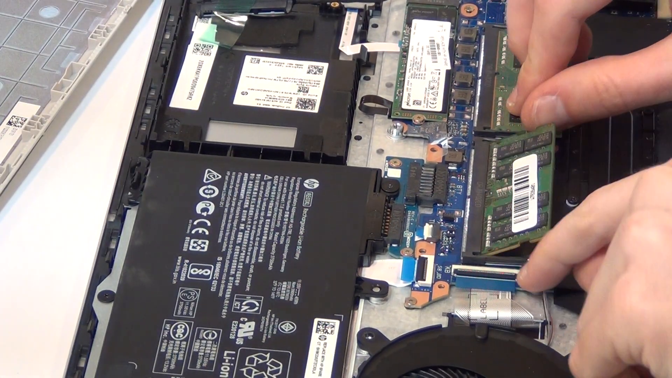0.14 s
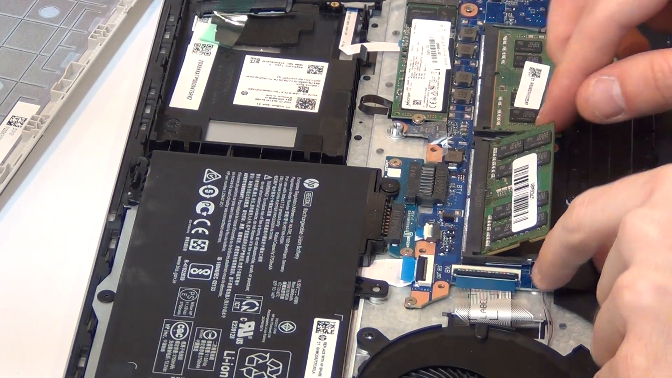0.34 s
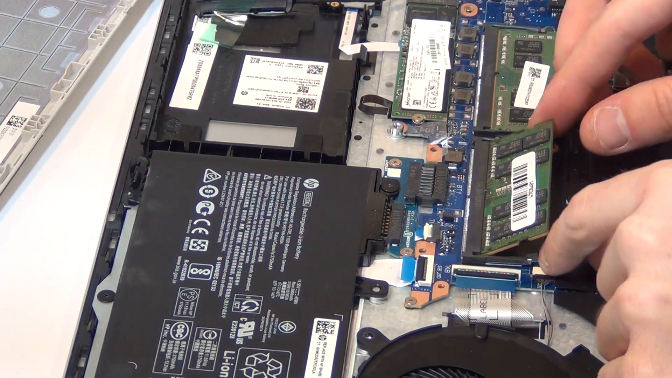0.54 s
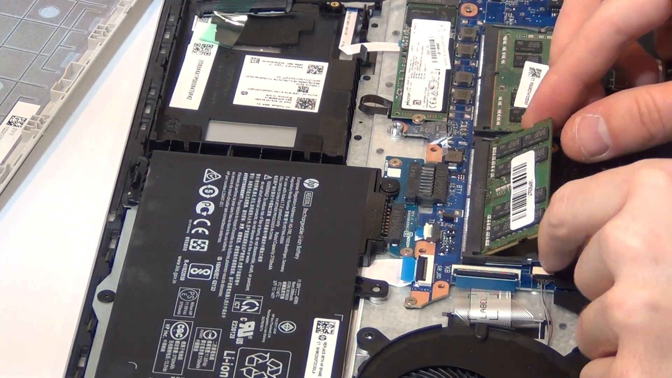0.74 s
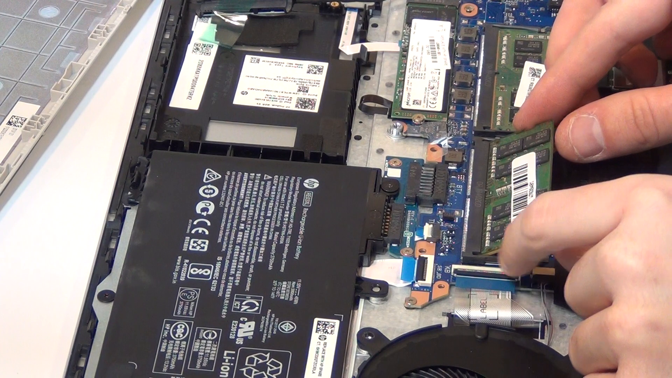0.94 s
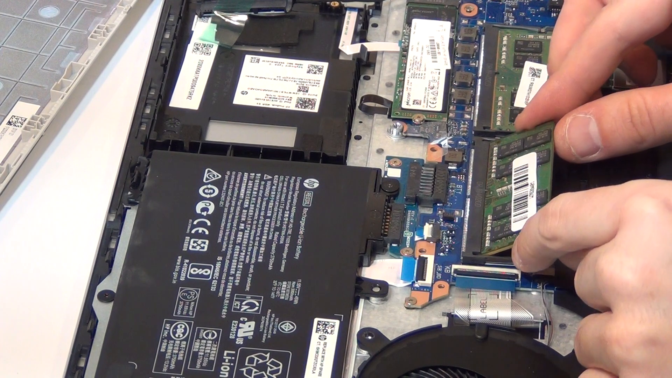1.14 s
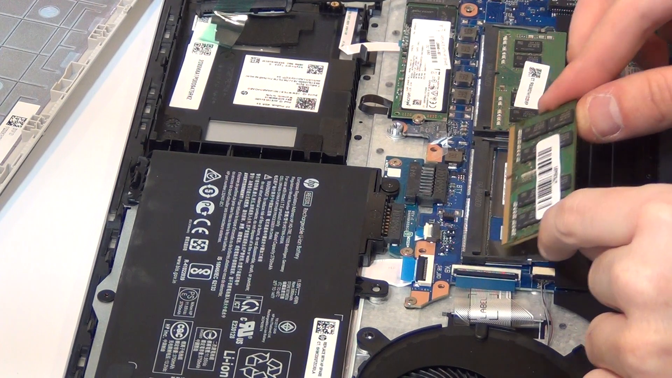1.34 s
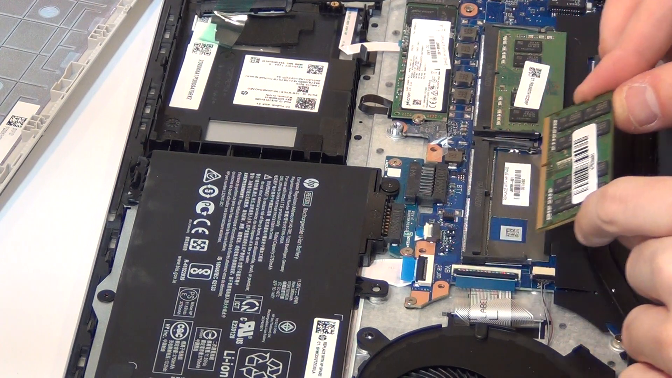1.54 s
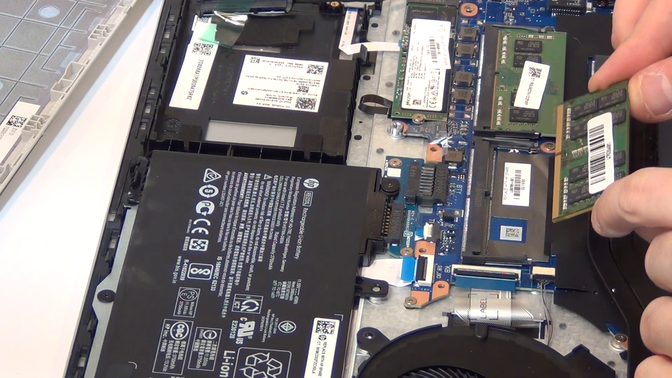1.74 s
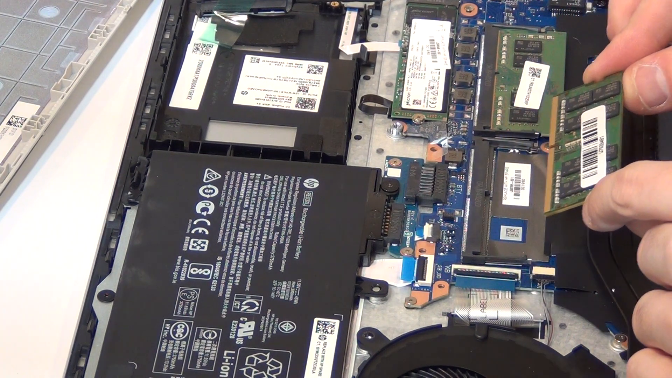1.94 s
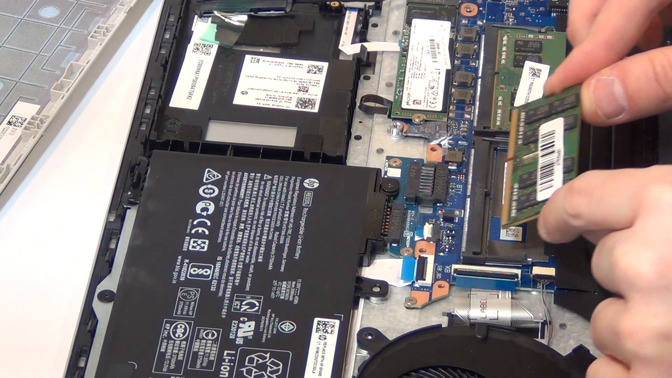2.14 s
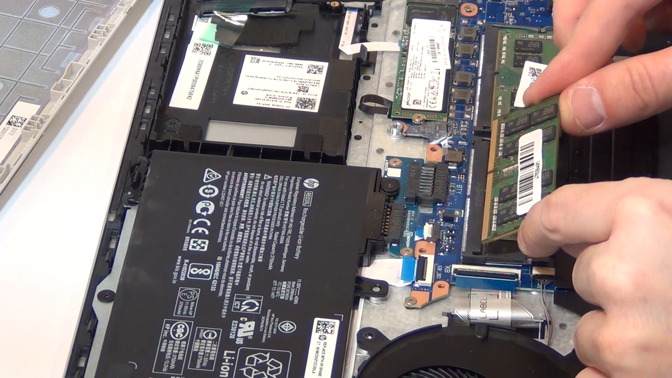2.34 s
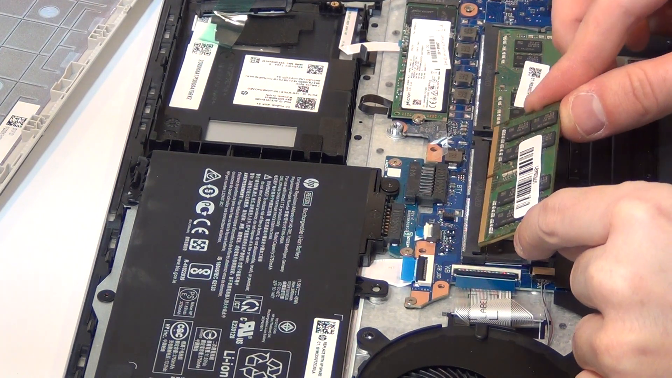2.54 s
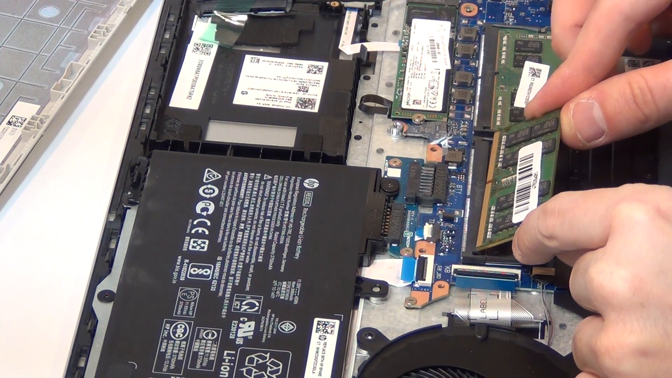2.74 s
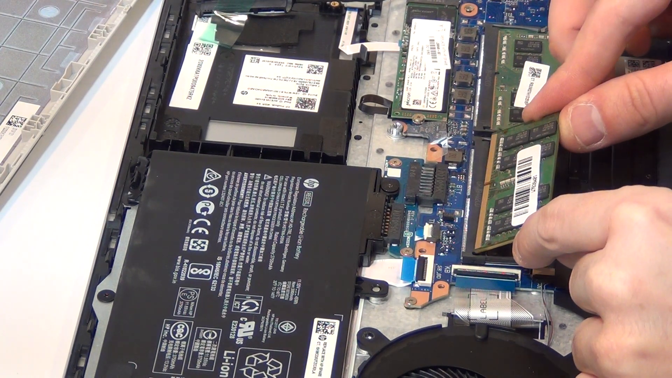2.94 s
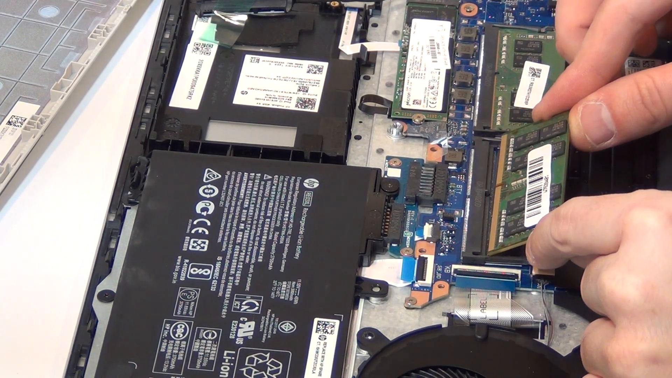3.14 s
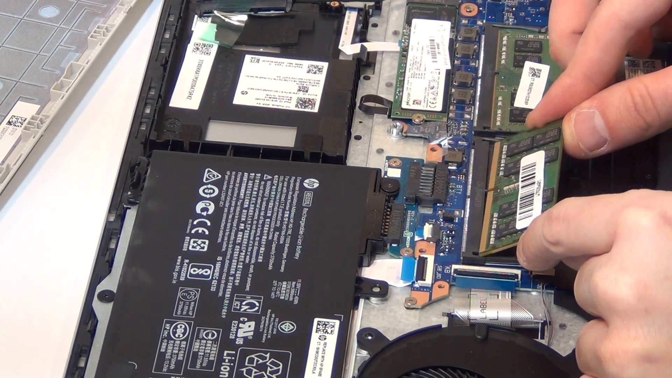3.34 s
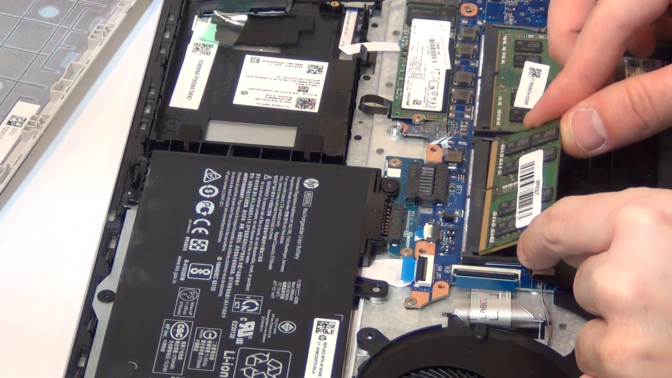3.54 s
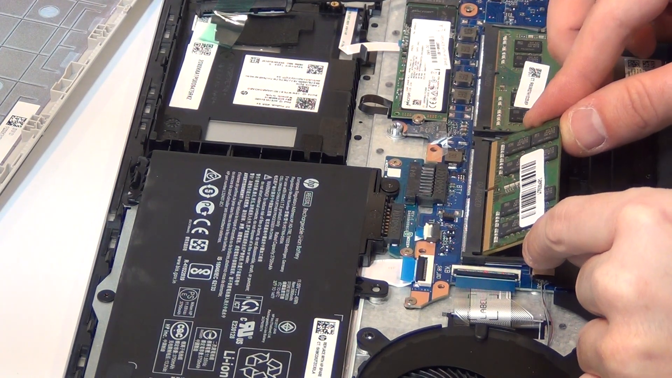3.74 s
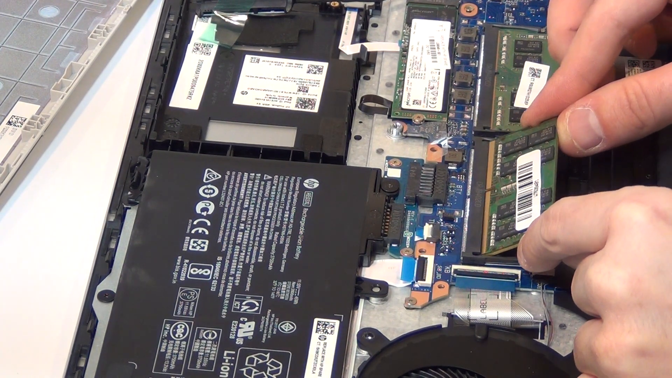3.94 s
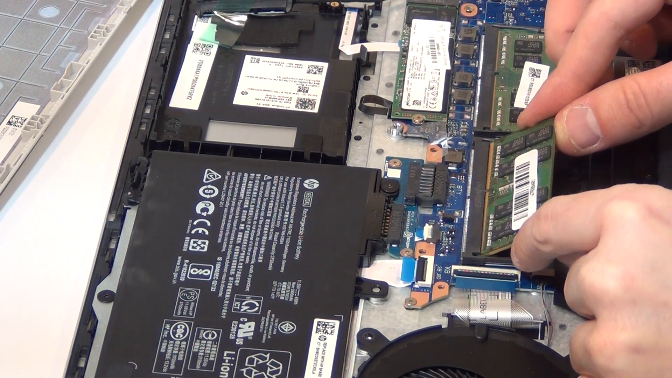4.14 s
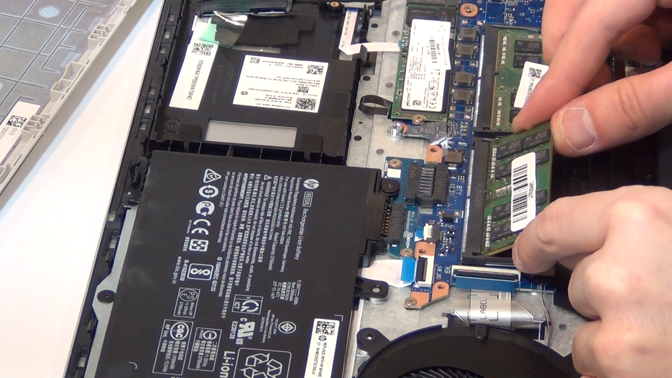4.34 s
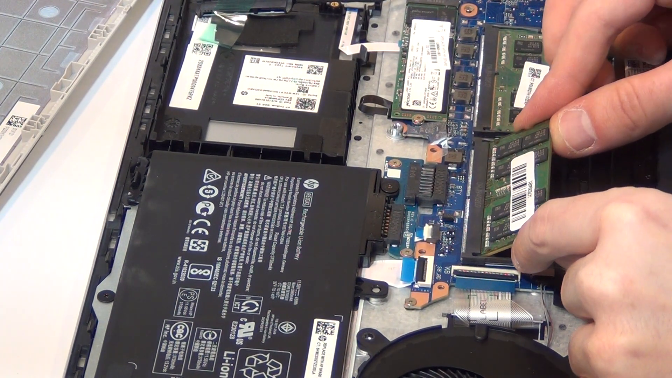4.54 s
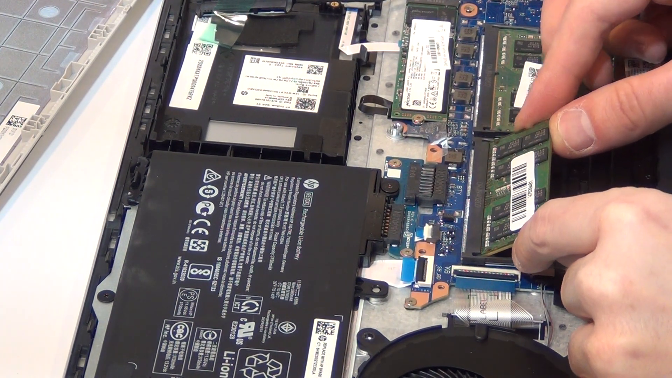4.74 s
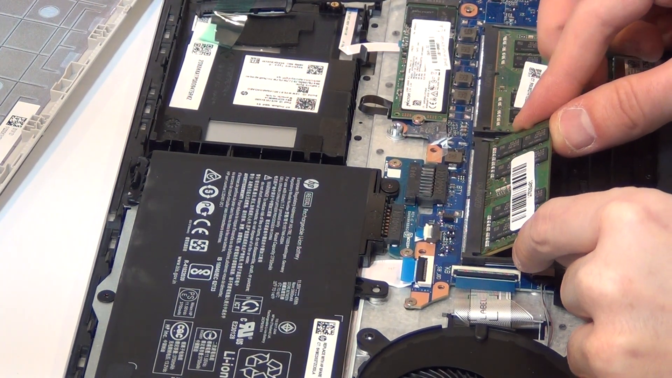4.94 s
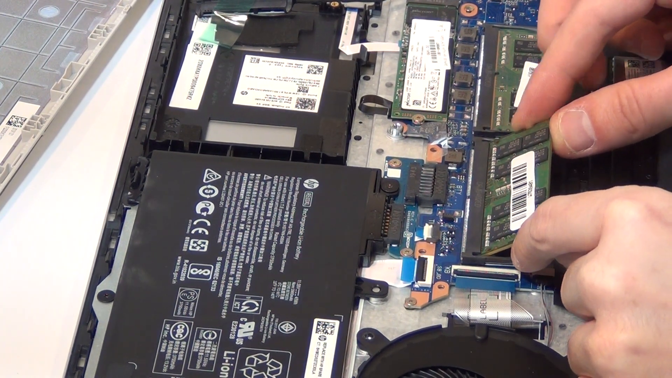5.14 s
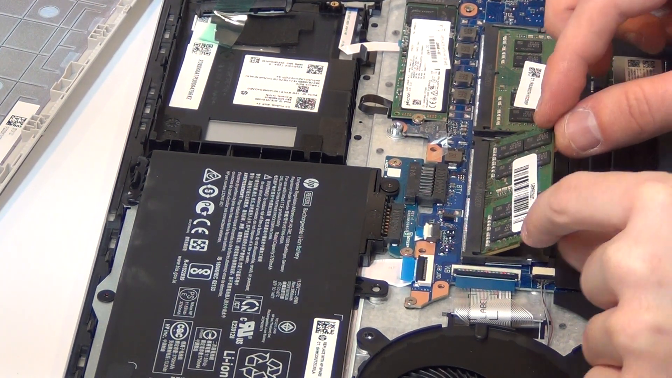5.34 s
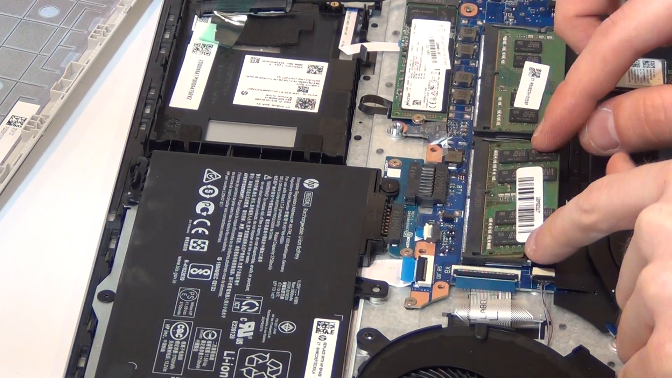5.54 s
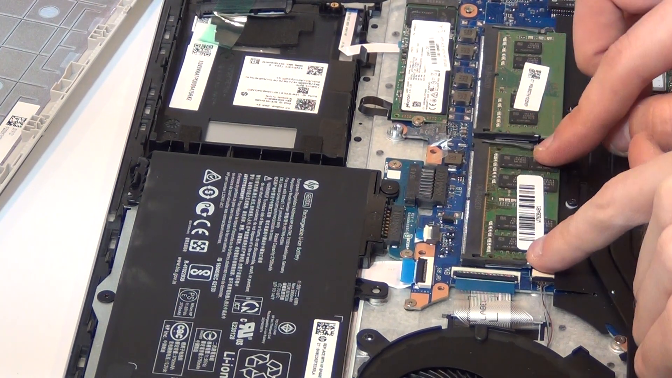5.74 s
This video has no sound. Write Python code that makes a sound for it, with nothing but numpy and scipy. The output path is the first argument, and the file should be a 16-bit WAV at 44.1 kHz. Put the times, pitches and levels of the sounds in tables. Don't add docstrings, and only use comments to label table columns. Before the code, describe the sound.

Fingers work a thin memory module in a hollow laptop chassis, very near the microphone. Opening clicks and a scrape, a few light ticks and knocks, long near-silence with faint rubbing, then hard cracks as the board seats. A quick crackle of clip ticks ends in one piercing snap with short room decay, over steady low hum, soft hiss and a barely audible high whine.

```python
import sys
import numpy as np
from scipy import signal
from scipy.fft import rfft, irfft, next_fast_len
from scipy.io import wavfile
from scipy.ndimage import map_coordinates

SR = 44100
rng = np.random.default_rng(int(sys.argv[2]) if len(sys.argv) > 2 else 0)


def gain_from_db(level_db):
    decades = np.asarray(level_db, float) / 20
    return 10 ** decades


def unload_audio(sound):
    columns = np.transpose(np.atleast_2d(sound))
    steps = np.round(np.clip(columns, -1, 1) * 32767)
    wavfile.write(sys.argv[1], SR, steps.astype(np.int16))


N = 258867

# [f/Hz, level/dB per Hz]
RUMBLE_SPECTRUM = [(4, -27), (10, -14), (15, 1), (30, 7), (42, 1), (65, 0.5), (90, -4), (200, -12),
                   (260, -11), (350, -19), (500, -36), (900, -120)]
# [f/Hz, level/dB per Hz]
AIR_SPECTRUM = [(150, -22), (250, -8), (425, -5), (568, -7), (611, -7.5), (664, -7.5), (1540, -12.5),
                (2060, -19.5), (3000, -22.5), (3900, -25), (6600, -120)]
# [f/Hz, level/dB per Hz]
HISS_SPECTRUM = [(500, -60), (1000, -27), (2000, -0.5), (5000, -1.5), (10000, -3), (13000, -4.5),
                 (14500, -3.5), (17000, -5)]
# [f/Hz, side minus mid level/dB]
STEREO_WIDTH = [(60, -41), (200, -31.5), (700, -22), (1300, -26), (2400, -18), (4400, -13), (8000, -8.5),
                (15000, -6)]
# [multiple of the rotation, rms level/dB]
FAN_ORDERS = [(1, -37.5), (2, -57), (3, -62), (5, -64), (10, -69), (11, -68)]
# [multiple of the mains, rms level/dB]
MAINS_ORDERS = [(1, -45), (2, -59), (3, -64)]
# [multiple of the rotation, rms level/dB]
MOTOR_ORDERS = [(.25, -54), (1, -48.5), (2, -63)]
# [t/s, f/Hz]
WHINE_PITCH = [(0.0, 15181), (0.03, 15172), (0.44, 15315), (0.52, 15073), (0.78, 15500), (1.27, 15402),
               (1.93, 15226), (2.34, 15378), (2.66, 15082), (2.81, 15344), (3.37, 15240), (3.42, 15420),
               (4.05, 15246), (4.76, 15481), (5.72, 15241), (5.87, 15300)]
# [t/s, length/s, level/dB, centre f/Hz, width over centre f]
STROKE_EVENTS = [(0, 0.023, -37, 4040, 2), (0.174, 0.074, -51, 1010, .9), (.19, .11, -57, 10000, 1.1),
                 (0.224, 0.052, -58.5, 6800, .08), (0.719, .3, -57.5, 890, 1.5),
                 (0.782, 0.18, -60, 6000, 1.2), (1.213, 0.047, -44.5, 6500, 1.9),
                 (1.239, 0.047, -47, 1000, 1.4), (1.381, 0.25, -57, 7000, 0.95),
                 (1.28, 0.37, -57.5, 1300, 0.96), (3.03, .11, -53.5, 950, 1), (3.298, 0.35, -63, 885, 0.94),
                 (3.592, 0.022, -56, 9000, .55), (3.701, 0.39, -64, 890, 1.3),
                 (4.202, .016, -50, 10000, .8), (4.215, 0.11, -60, 3300, 0.54),
                 (4.318, 0.036, -55, 9000, .6), (5.199, .04, -59, 9000, .55), (5.36, 0.064, -60, 4670, .2)]
# [t/s, peak level/dB, ring f/Hz, knock level/dB re tick]
TICK_EVENTS = [(0.0004, -29.5, 5900, -9), (0.0064, -30.5, 9000, -9), (0.1837, -29.5, 11200, -26),
               (0.2894, -44, 6700, -14), (1.2033, -34, 6500, -36), (1.2035, -40, 3370, -36),
               (1.238, -35.5, 7600, -10), (3.5994, -48.5, 10000, 2), (4.1342, -26, 12800, -30),
               (4.1444, -46, 3080, -5), (4.2168, -43.5, 3050, 7), (4.9201, -33.5, 6540, -27),
               (5.224, -51, 7580, 1.5), (5.3924, -45, 4750, -10), (5.5755, -42, 3150, -8),
               (5.605, -36, 6680, -4), (5.6118, -31, 4460, -12.5), (5.614, -31, 3050, -18),
               (5.6345, -41, 3070, -1), (5.651, -35, 6260, -16), (5.655, -42, 3080, -8)]
# [t/s, peak level/dB, ring f/Hz, knock level/dB re tick]
CLIP_RIDE = [
    (5.6876, -31, 5000, -11),
    (5.6922, -31, 6300, -14),
    (5.6955, -29, 5000, -3),
    (5.698, -31, 8000, -3),
    (5.7025, -28, 6800, -8),
]
# [t/s, peak level/dB]
THUD_EVENTS = [
    (0.0004, -30),
    (0.2233, -38.5),
    (.41, -41.5),
    (3.233, -46),
    (4.1328, -25.5),
    (5.0103, -38.5),
]
# [t/s, crack peak level/dB, knock level/dB re crack, knock f/Hz, whole-
# board level/dB re spot ring]
CONTACT_EVENTS = [(0.0118, -26, -20, 1800, 0), (0.0153, -23, -6.5, 593, 10), (0.196, -46, 6, 940, -2),
                  (0.41, -29.5, 0.5, 595, 8), (1.2539, -45.5, 4, 557, 2), (3.415, -57, 15, 680, 0),
                  (3.427, -58, 13, 690, 0), (3.5103, -42.5, 4.5, 1310, 18), (3.668, -56.5, 15, 676, 2),
                  (3.921, -42.5, 6.5, 607, 6), (4.1334, -20, -5.5, 717, 0.5), (4.2098, -23, 1.5, 940, -0.5),
                  (4.341, -31.5, -3, 1030, -7), (5.6, -30, 2.5, 980, 2)]
# [f/Hz, width/Hz, level/dB]
BOARD_MODES = [(1930, 1700, 0), (3420, 620, -8), (4350, 840, 1), (8500, 4200, 2.5), (11570, 3100, 3),
               (15300, 2100, -23)]
# [f/Hz, width/Hz, level/dB]
CHASSIS_MODES = [(557, 45, 2.5), (824, 106, 3.5), (895, 380, -1.5), (1350, 410, -2), (1500, 230, 0.5),
                 (1893, 140, 3)]
# [f/Hz, width/Hz, level/dB]
DESK_MODES = [(119, 11, 15), (259, 40, -1), (322, 73, 2.5)]
# [f/Hz, t60/s]
ROOM_DECAY = [(150, 0.49), (600, 0.39), (2000, 0.39), (5000, 0.44), (12000, 0.33)]
# [delay/s, peak level/dB, ring f/Hz, ring width/Hz]
CLIP_SNAPS = [
    (0, 4.5, 6280, 1310),
    (.0037, -7, 11900, 1500),
]
# [f/Hz, width/Hz, level/dB]
SNAP_MODES = [(125.4, 20.5, 3.5), (261.4, 27.5, 0.5), (432, 56, -4), (554, 39, 3), (850, 210, -2),
              (898, 37, -5), (1200, 290, -0.5), (3580, 320, -11), (4500, 1000, -12), (9000, 5900, -15)]

SNAP_S = 5.70755
BOARD_HZ = 3150


def unit(x):
    return x / np.sqrt(np.mean(x ** 2) + 1e-20)


def peak1(x):
    return x / np.max(np.abs(x))


def along(points, hz):
    f, v = np.transpose(points)
    return np.interp(np.log(hz + 1), np.log(f + 1), v)


def curve(rows):
    return np.interp(np.arange(N) / SR, *np.transpose(rows))


def wobble(rate):
    knots = rng.standard_normal(int(N * rate / SR) + 4)
    return map_coordinates(knots, [np.arange(N) * rate / SR])


def filtered(x, response):
    m = next_fast_len(x.shape[-1] + 4096)
    return irfft(rfft(x, m) * response(np.fft.rfftfreq(m, 1 / SR)), m)[..., :x.shape[-1]]


def body(modes):
    def response(f):
        total = 0
        for k, (centre, width, db) in enumerate(modes):
            damping = 1j * f * width
            total = total + (-1) ** k * gain_from_db(db) * damping / (centre * centre - f * f + damping)
        return total
    return response


def add(out, s, sound):
    out[round(s * SR):][:len(sound)] += sound


def rush(spectrum):
    def shape(hz):
        return gain_from_db(along(spectrum, hz)) * np.array([np.ones_like(hz), gain_from_db(along(STEREO_WIDTH, hz))])
    mid, side = filtered(rng.standard_normal((2, N)), shape)
    return unit(np.array([mid + side, mid - side]))


def background():
    rumble = gain_from_db(-43.5 + 0.48 * wobble(2.43)) * rush(RUMBLE_SPECTRUM)
    air = gain_from_db(-53 + 0.7 * wobble(6.02)) * rush(AIR_SPECTRUM)
    hiss = gain_from_db(-55.5) * rush(HISS_SPECTRUM)
    return rumble + air + hiss


def drone(base_hz, orders, drift, sway_db):
    turns = np.cumsum(base_hz * (1 + drift * wobble(1.54))) / SR
    total = np.zeros(N)
    for multiple, db in orders:
        tone = np.sqrt(2) * np.sin(2 * np.pi * (multiple * turns + rng.random()))
        total += gain_from_db(db + sway_db * wobble(2.57)) * tone
    return total


def machines():
    fan = drone(23.3, FAN_ORDERS, drift=0.0021, sway_db=1.0)
    mains = drone(50.0, MAINS_ORDERS, drift=0.00029, sway_db=-2.0)
    motor = drone(55.6, MOTOR_ORDERS, drift=0.012, sway_db=-1.0)
    return fan + mains + motor


def whine():
    pitch_hz = curve(WHINE_PITCH) + 75 * wobble(40) + 60 * wobble(300)
    turns = np.cumsum(pitch_hz) / SR
    scan = gain_from_db(-81) * np.sin(2 * np.pi * 15625 * np.arange(N) / SR)
    return gain_from_db(-64.5 + 1.5 * wobble(30)) * np.sin(2 * np.pi * turns) + scan


def strokes():
    grains_per_cycle = 0.77
    count = SR // 3
    out = np.zeros(N + SR)
    for s, length, db, centre_hz, width in STROKE_EVENTS:
        hits = rng.random(count) < grains_per_cycle * centre_hz / SR
        grains = hits * rng.standard_normal(count)
        surface = body([(centre_hz, width * centre_hz, 0)])
        rub = unit(filtered(grains, lambda f: surface(f) ** 2))
        swell = np.sin(np.pi * np.clip(np.arange(count) / SR / length, 0, 1))
        add(out, s, gain_from_db(db) * swell * rub)
    return out[:N]


def touch(chatter):
    t = np.arange(SR // 8) / SR
    burst = rfft(rng.standard_normal(len(t)) * np.exp(-t / chatter))
    even = irfft(burst / np.abs(burst) ** 0.8, len(t))
    return even * np.exp(-(t / (2 * chatter)) ** 2)


def crack(ring_hz, board_db, chatter):
    spot = body([(ring_hz, 0.34 * ring_hz, 0)])
    ring = filtered(touch(chatter), lambda f: spot(f) ** 2)
    rise = lambda f: 1j * f / (1500 + 1j * f)
    board = filtered(touch(chatter), lambda f: rise(f) * body(BOARD_MODES)(f))
    return peak1(peak1(ring) + gain_from_db(board_db) * peak1(board))


def knock(modes, centre_hz, soft):
    spot = body([(centre_hz, 0.8 * centre_hz, 0)])
    panel = body([(centre_hz, 0.1 * centre_hz, 3)])
    push = np.exp(-np.arange(SR // 8) / SR / soft)
    struck = [(c * (1 + 0.03 * rng.normal()), w, g + 1.5 * rng.normal()) for c, w, g in modes]
    return peak1(filtered(push, lambda f: spot(f) * (body(struck)(f) + 1j * panel(f))))


def ticks():
    out = np.zeros(N + SR)
    for s, db, ring_hz, knock_db in TICK_EVENTS + CLIP_RIDE:
        board_db = 1.5 - 4.5 * np.log2(ring_hz / BOARD_HZ)
        click = crack(ring_hz, board_db, chatter=0.00079)
        below = gain_from_db(knock_db + 0.5) * knock(CHASSIS_MODES, 960, soft=0.0001)
        add(out, s + 0.00055, gain_from_db(db + 6) * (click + below))
    return out[:N]


def thuds():
    out = np.zeros(N + SR)
    for s, db in THUD_EVENTS:
        add(out, s + 0.00069, gain_from_db(db) * knock(DESK_MODES, 337, soft=0.00017))
    return out[:N]


def contacts():
    out = np.zeros(N + SR)
    for s, db, knock_db, knock_hz, board_db in CONTACT_EVENTS:
        chassis = knock(CHASSIS_MODES, knock_hz, soft=0.0001)
        desk = gain_from_db(-9.5) * knock(DESK_MODES, 325, soft=0.00015)
        board = crack(BOARD_HZ, board_db, chatter=0.0024)
        add(out, s + 0.00066, gain_from_db(db + 2) * (board + gain_from_db(knock_db) * (chassis + desk)))
    return out[:N]


def room(x):
    out = np.zeros(N + SR)
    for start in range(0, N, SR // 4):
        part = x[start:start + SR // 4]
        hz, t, z = signal.stft(rng.standard_normal((3, SR // 2)), SR, nperseg=256)
        decay_db = -60 * t / along(ROOM_DECAY, hz)[:, None]
        dulling_db = -2.1 * np.log2(1 + hz[:, None] / 4000)
        tails = signal.istft(z * gain_from_db(decay_db + dulling_db), SR, nperseg=256)[1]
        thirds = np.arange(len(part)) // 40 % 3 == np.arange(3)[:, None]
        wet = signal.fftconvolve(part * thirds, tails / np.linalg.norm(tails[0]), axes=1).sum(axis=0)
        add(out, start / SR + 0.003, wet)
    return out[:N]


def snap():
    near, far = np.zeros((2, N + SR))
    for delay, db, ring_hz, width_hz in CLIP_SNAPS:
        push = np.exp(-np.arange(SR // 8) / SR / 0.00005)
        blow = peak1(filtered(push, body(SNAP_MODES)))
        clip = body([(ring_hz, width_hz, 0), (12000, 2000, -10)])
        ring = peak1(filtered(touch(0.0013), clip))
        board = crack(3500, board_db=25, chatter=0.0017)
        add(near, SNAP_S + delay, gain_from_db(db) * (blow + 0.62 * ring))
        add(far, SNAP_S + delay, gain_from_db(db) * (blow + 0.36 * ring + 0.47 * board))
    return near[:N], far[:N]


def settle():
    t = np.clip(np.arange(N) / SR - SNAP_S, 0, None)
    slow = np.sin(2 * np.pi * 22 * t) * np.exp(-t / 0.03)
    quick = 0.48 * np.sin(2 * np.pi * 120 * t) * np.exp(-t / 0.011)
    return gain_from_db(-26) * (slow + quick) * np.array([[1], [-1]])


def scene():
    light = strokes() + ticks() + thuds() + contacts()
    near, far = snap()
    walls = room(gain_from_db(-10.5) * light + gain_from_db(-7) * far)
    soft = background() + machines() + whine() + light + walls
    soft_top_hz = 15770
    return near + filtered(soft, lambda hz: np.clip((soft_top_hz - hz) / 40 + 0.5, 0, 1))


def low_pass(x):
    return signal.sosfilt(signal.butter(12, 16820, fs=SR, output="sos"), x)


def record(dry):
    hot = dry / (1 + np.abs(dry / 0.88) ** 6) ** (1 / 6)
    top_hz = 15950
    mix = filtered(hot, lambda hz: 1 / (1 + (hz / top_hz) ** 80)) + settle()
    return low_pass(mix)


dry = scene()
out = record(dry)
unload_audio(out)
```